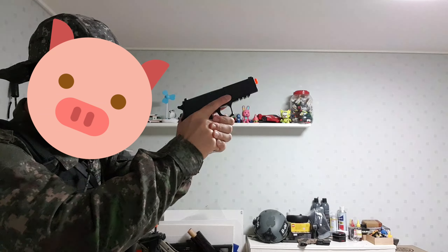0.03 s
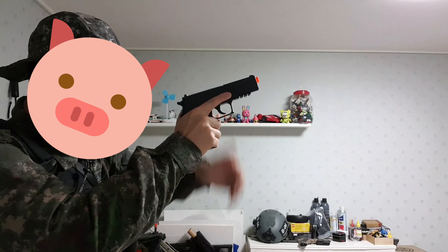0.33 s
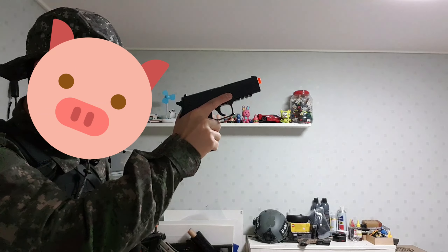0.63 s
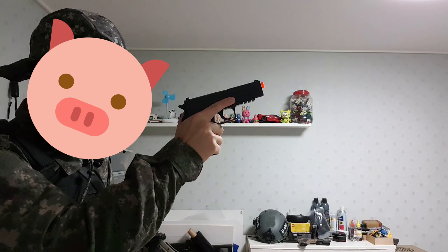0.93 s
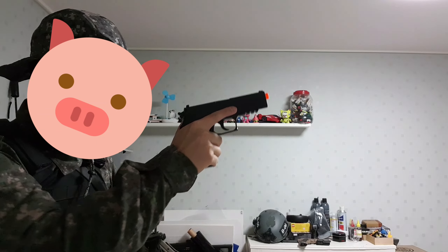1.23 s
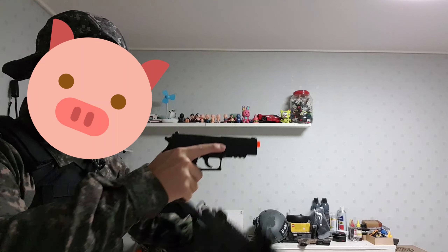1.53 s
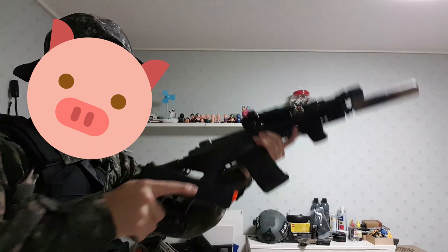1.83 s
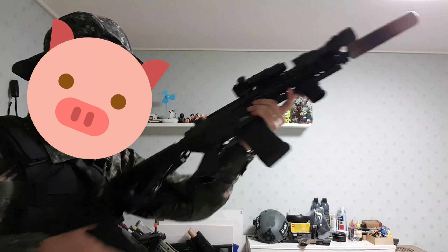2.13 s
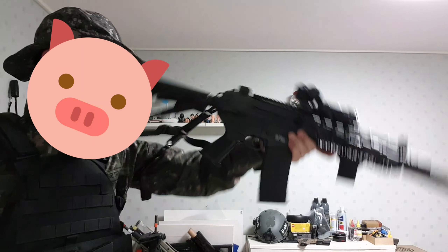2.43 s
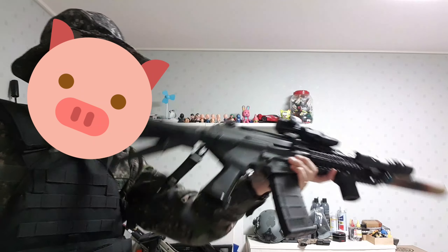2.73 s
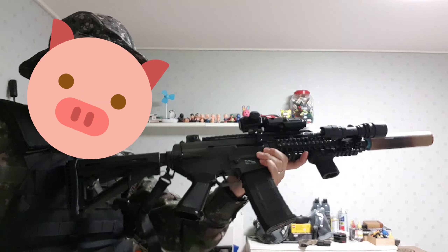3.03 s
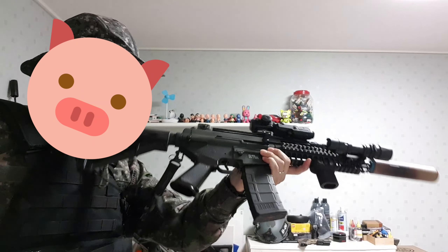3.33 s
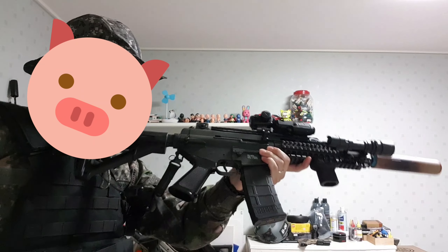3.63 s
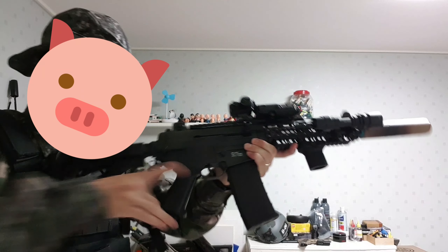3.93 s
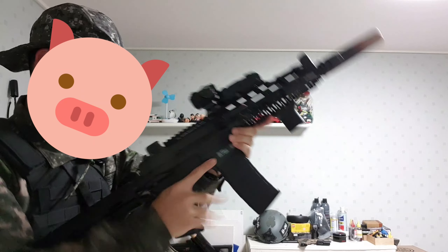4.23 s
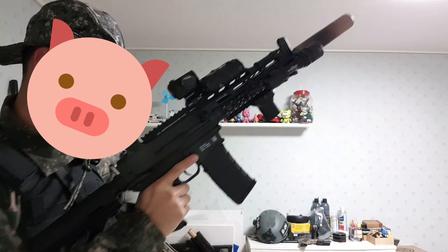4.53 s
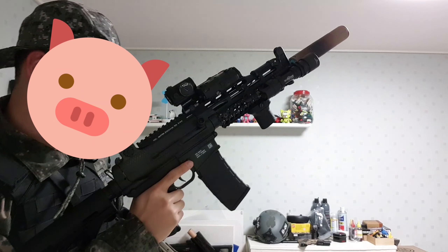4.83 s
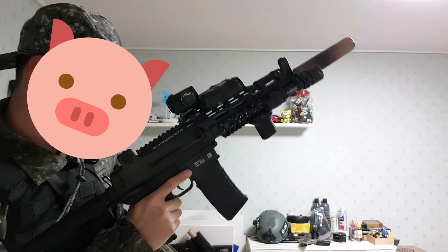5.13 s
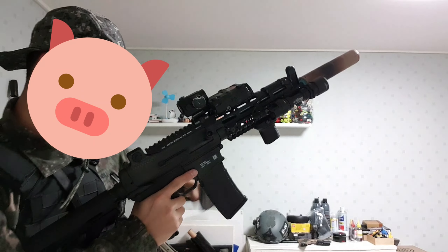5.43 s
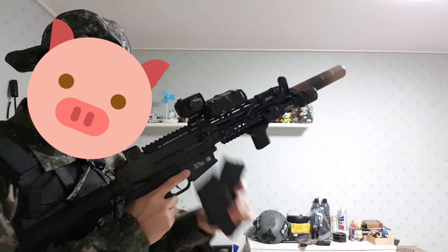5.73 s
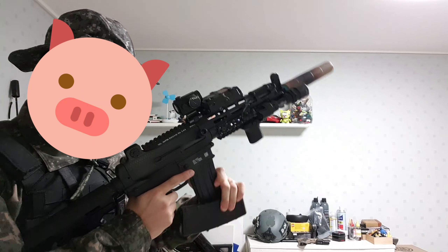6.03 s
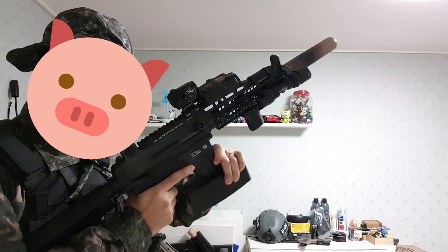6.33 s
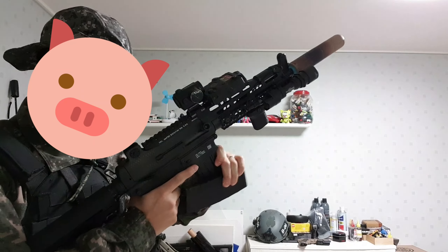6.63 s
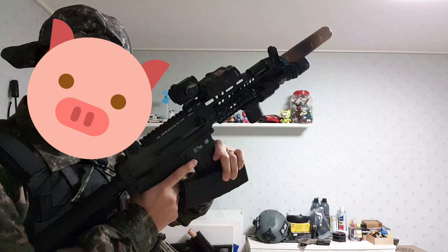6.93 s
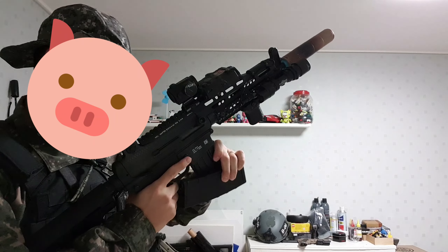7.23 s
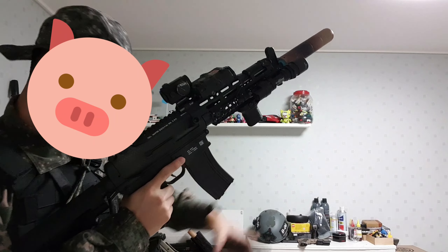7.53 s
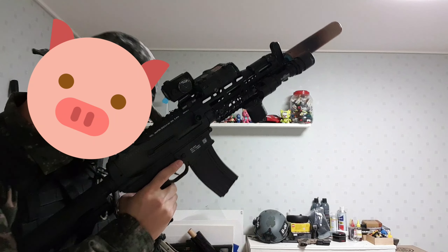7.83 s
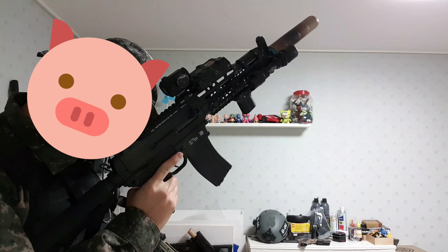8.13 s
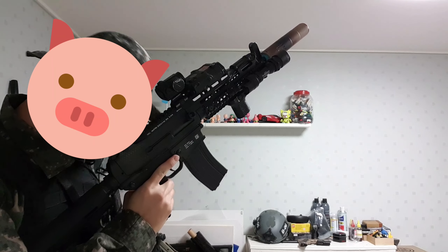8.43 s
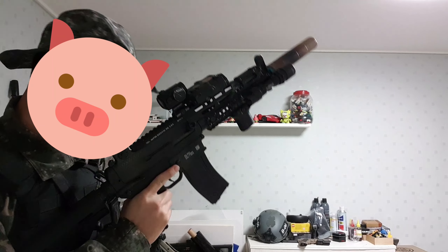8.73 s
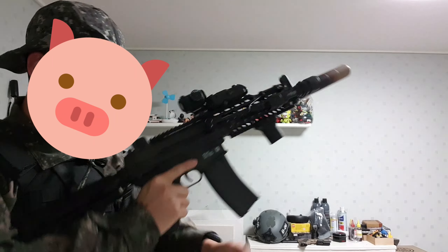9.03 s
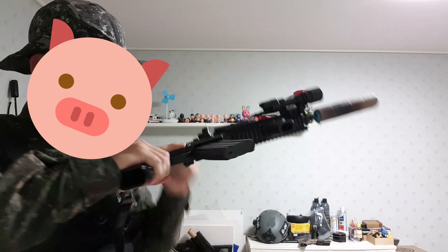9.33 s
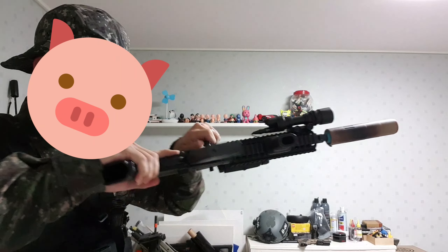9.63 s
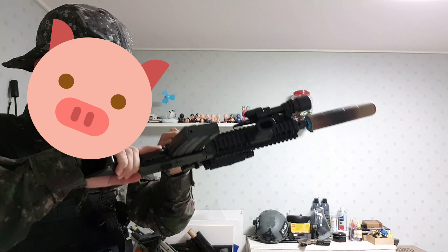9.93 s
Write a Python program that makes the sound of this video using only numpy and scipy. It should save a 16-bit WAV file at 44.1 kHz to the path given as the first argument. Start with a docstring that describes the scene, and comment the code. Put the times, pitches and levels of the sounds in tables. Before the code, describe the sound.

Jacket sleeves rub over a vest while plastic and metal gun parts click, grind and snap together during a magazine change.

```python
"""A replica rifle is swung up and its magazine changed, after a toy pistol has been put away.
Plastic and metal parts click, grind and knock, ringing the hollow shell; a small steel part pings.
The sleeves of a field jacket rub over a vest, folds flap, buckles tick and the rifle bumps the body.
A stereo microphone stands close to the hands in a small, bare room, with short reflections
from the walls and a faint room tone underneath."""
import sys
import numpy as np
from scipy import signal
from scipy.fft import rfft, irfft, next_fast_len
from scipy.io import wavfile

SR = 44100
rng = np.random.default_rng(int(sys.argv[2]) if len(sys.argv) > 2 else 0)


def unload_wav(signal):
    """Save mono or channel-first audio to the path in sys.argv[1] as 16-bit WAV at rate SR, clipped to [-1, 1]."""
    wavfile.write(
        sys.argv[1],
        SR,
        np.round(np.clip(np.atleast_2d(signal).T, -1, 1) * 32767).astype(np.int16),
    )


N = 440559
TIME = np.arange(N) / SR


def from_db(db):
    """Decibels to gain."""
    return 10 ** (np.asarray(db) / 20)


def unit(x):
    """Scale to rms 1."""
    return x / np.sqrt(np.mean(x ** 2) + 1e-20)


def in_time(rows):
    """Each column of a curve at every sample."""
    times, *columns = np.transpose(rows)
    return [np.interp(TIME, times, column) for column in columns]


def at_hz(points, hz):
    """Read a table on a log-frequency axis."""
    freqs, values = np.transpose(points)
    return np.interp(np.log(np.maximum(hz, 1)), np.log(freqs), values)


def flutter(rate):
    """Random wander of rms 1, with `rate` new values a second."""
    return unit(np.interp(TIME * rate, np.arange(N), rng.standard_normal(N)))


def ring(x, hz, t60_s):
    """A resonance of gain 1 at its peak."""
    r = from_db(-60 / (t60_s * SR))
    poles = [1, -2 * r * np.cos(2 * np.pi * hz / SR), r * r]
    return signal.lfilter(np.array([1, 0, -1]) * (1 - r * r) / 2, poles, x + 1e-18)


def colour(x, spectrum, size=2048):
    """Minimum-phase filter with the given spectrum; white noise keeps its power."""
    cepstrum = irfft(np.log(from_db(at_hz(spectrum, np.fft.rfftfreq(size, 1 / SR)))))
    cepstrum[1:size // 2] *= 2
    cepstrum[size // 2 + 1:] = 0
    pulse = irfft(np.exp(rfft(cepstrum)))
    pulse = (pulse / np.linalg.norm(pulse)).reshape((1,) * (x.ndim - 1) + (size,))
    return signal.fftconvolve(x, pulse, axes=-1)[..., :x.shape[-1]]


# Left-right likeness at the microphone, for close sound and for the room: freq_hz, correlation
CLOSE_LIKENESS = [(600, 0.97), (1400, 0.98), (3000, 0)]
ROOM_CORRELATION = [(450, 0.66), (800, 0.26), (1500, -0.3), (2800, 0.1)]
def stereo_noise(likeness, size):
    """White noise whose two sides are as alike at each frequency as the table says."""
    n = next_fast_len(size)
    mid, side = rfft(rng.standard_normal((2, n)))
    alike = np.clip(at_hz(likeness, np.fft.rfftfreq(n, 1 / SR)), -1, 1)
    left_right = np.sqrt(1 + alike) * mid + np.sqrt(1 - alike) * side * [[1], [-1]]
    return unit(irfft(left_right, n)[:, :size])


# Room tone all around the microphone: freq_hz, level_db
ROOM_TONE = [(20, -29.5), (35, -2), (55, 2.5), (200, -5.5), (450, -4.5), (1000, -15.5), (2300, -9),
             (3200, -22.5), (13500, -18.5)]
def room_tone():
    """The still air of the room: faint, steady noise, strongest in the bass."""
    return from_db(-70) * unit(colour(stereo_noise(ROOM_CORRELATION, N), ROOM_TONE))


# Reverberation of the small, bare room: freq_hz, t60_s
ROOM_DECAY = [(100, 0.25), (400, 0.21), (1000, 0.14), (5000, 0.25), (14000, 0.2)]
def room(x, first_s, build_s, size=22050):
    """Reflections from near walls thicken quickly and die away, each octave at its own rate."""
    t, hz = TIME[:size], np.fft.rfftfreq(size, 1 / SR)
    echoes = rfft(stereo_noise(ROOM_CORRELATION, size))
    octaves_hz = 110 * 2. ** np.arange(8)
    onset = 1 - np.exp(-np.maximum(t - first_s, 0) / build_s)
    response = 0
    for centre, share in zip(octaves_hz, np.eye(len(octaves_hz))):
        fade = onset * from_db(-60 * t / at_hz(ROOM_DECAY, centre))
        band = irfft(echoes * at_hz(np.c_[octaves_hz, share], hz), size)
        response = response + band * fade / np.linalg.norm(fade)
    return signal.fftconvolve(x, response, axes=-1)[:, :N]


def moving_room(x, count=6, patterns_per_s=14):
    """As the hands move, one pattern of reflections passes smoothly into the next."""
    out, place = 0, TIME * patterns_per_s
    for k in range(count):
        away = np.minimum(np.abs((place - k + count / 2) % count - count / 2), 1)
        out = out + room(x * np.cos(np.pi / 2 * away), first_s=.0014, build_s=0.00092)
    return out


# Faint rustle of the person standing at the microphone: time_s, level_db
BODY_STIR = [(0, -85), (1.2, -76.5), (1.45, -64), (2.0, -63), (2.45, -61.5), (3.2, -60.5), (4.4, -60.5),
             (5.1, -69), (6.0, -63.5), (6.5, -68), (7.7, -70), (8.6, -61.5), (9.99, -66)]
def stirring():
    """Power of (rubbing, hiss, folds) from a body that never keeps quite still."""
    stir_db, = in_time(BODY_STIR)
    mix_db = [-2, -6.5, -9]
    return from_db(stir_db + np.c_[mix_db]) ** 2


# A sleeve sweeps over the vest, close by: start_s, length_s, rubbing_db, hiss_db, folds_db
SLEEVE_STROKES = [(0.789, 0.11, -59.5, -63.5, -75), (1.265, 0.063, -53.5, -54, -58),
                  (1.689, 0.14, -56.5, -52, -59.5), (2.24, 0.095, -59, -65, -70),
                  (2.398, 0.19, -62, -61.5, -64), (2.723, 0.1, -56.5, -50.5, -53),
                  (2.854, 0.036, -52.5, -51, -45), (3.105, 0.093, -68, -56, -66),
                  (3.382, 0.22, -53, -52.5, -51.5), (3.491, 0.037, -47, -44, -47),
                  (4.032, 0.18, -63.5, -71, -61.5), (4.29, 0.091, -43, -47.5, -51.5),
                  (4.522, 0.056, -66, -51.5, -58), (4.708, 0.1, -59, -71, -59),
                  (5.232, 0.049, -35.5, -41.5, -54), (5.726, 0.073, -44, -55, -76),
                  (6.07, 0.067, -50, -54, -51), (6.37, 0.1, -44, -47.5, -57),
                  (6.757, 0.13, -46, -46.5, -60), (7.426, 0.045, -42.5, -48, -65.5),
                  (8.051, 0.032, -48.5, -69, -49.5), (8.314, .11, -53, -79, -64),
                  (9.09, 0.16, -57, -64, -55.5), (9.454, 0.073, -66, -54, -64),
                  (9.707, 0.18, -57.5, -54.5, -50)]
def sleeve_sweeps(attack_db_per_s=449.5, release_db_per_s=226.5):
    """Power of (rubbing, hiss, folds): each stroke swells, holds while the arm moves, and fades."""
    power, t = 0, TIME[::32]
    for start, length, *levels_db in SLEEVE_STROKES:
        swell_db = -attack_db_per_s * np.maximum(start - t, 0)
        fade_db = -release_db_per_s * np.maximum(t - start - length, 0)
        power = power + from_db(np.c_[levels_db] + np.maximum(swell_db + fade_db, -100)) ** 2
    return np.array([np.interp(TIME, t, layer) for layer in power])


def fading(rows, mix_db, db_per_s, backwards=False):
    """Power of (rubbing, hiss, folds) that dies away after each contact, or builds up towards it."""
    times, clack_db, snap_db = np.transpose(rows)
    levels_db = np.array([clack_db, snap_db, clack_db]) + np.c_[mix_db]
    kicks = np.zeros((3, N))
    kicks[:, (times * SR).astype(int)] = from_db(levels_db) ** 2
    way = -1 if backwards else 1
    return signal.lfilter([1], [1, -from_db(-db_per_s / SR) ** 2], kicks[:, ::way] + 1e-18)[:, ::way]


def jolts():
    """Rustle power as surfaces slide before each scrape and cloth settles after each click or scrape."""
    sliding = fading(PART_SCRAPES, mix_db=[-14.5, -18.5, -28.5], db_per_s=747.5, backwards=True)
    settling = fading(PART_CLICKS + PART_SCRAPES, mix_db=[-23, -27.5, -40.5], db_per_s=142.5)
    return sliding + settling


def rustle(spectrum, catch_db, catch_rate, grain_db, grain_rate):
    """Cloth catches and slips; each slip is a cloud of tiny fibre grains."""
    catches = catch_db * np.clip(flutter(catch_rate), -2, 2)
    grains = grain_db * np.clip(flutter(grain_rate), -3, 3)
    return unit(colour(stereo_noise(CLOSE_LIKENESS, N) * from_db(catches + grains), spectrum))


# Folds, rubbing cloth and fibres at close range: freq_hz, level_db
FOLD_SPECTRUM = [(40, -19), (110, -7), (180, -13), (255, -1), (540, 1), (700, -6.5), (1200, -28)]
RUB_SPECTRUM = [(300, -28), (560, -2), (900, 2), (1300, -2), (1700, -3.5), (2500, -11), (3300, -27),
                (6000, -56.5)]
FIBRE_SPECTRUM = [(1500, -9.5), (2900, 1), (5500, 2), (14500, 2.5)]
def clothing(moving):
    """Sleeves and webbing: flapping folds, fibre hiss, and rubbing that also sounds the hollow shell."""
    rubbing, hissing, flapping = np.sqrt(moving + jolts())
    flap = flapping * rustle(FOLD_SPECTRUM, catch_db=3.5, catch_rate=55, grain_db=6.5, grain_rate=340)
    rub = rubbing * rustle(RUB_SPECTRUM, catch_db=4.5, catch_rate=82, grain_db=3.5, grain_rate=400)
    hiss = hissing * rustle(FIBRE_SPECTRUM, catch_db=0.5, catch_rate=92, grain_db=4.5, grain_rate=1300)
    hollow = from_db(-1) * ring(rub, hz=853, t60_s=0.18)
    return flap + rub + hollow + hiss


def blows(times, levels_db, spectrum, rise_s, decay_s, size=4096):
    """Each blow is a burst of chatter between two surfaces; its level is an rms over 10 ms."""
    t = TIME[:size]
    swell = (1 - np.exp(-t / rise_s)) * np.exp(-t / decay_s / 2)
    chatter = rfft(stereo_noise(CLOSE_LIKENESS, len(times) * size).reshape(2, -1, size) * swell)
    # a hard contact drives all frequencies evenly; only their timing is random
    even = irfft(chatter / (np.abs(chatter) + 1e-12), size)
    bursts = colour(even * swell, spectrum)
    bursts /= np.sqrt(np.sum(bursts ** 2, axis=(0, 2), keepdims=True) / (2 * .01 * SR))
    out = np.zeros((2, N + size))
    for k, (start_s, level_db) in enumerate(zip(times, levels_db)):
        start = int(start_s * SR)
        out[:, start:start + size] += from_db(level_db) * bursts[:, k]
    return out[:, :N]


# Low, middle and high parts of a hard contact, heard close up: freq_hz, level_db
BODY_SPECTRUM = [(40, -30), (130, -11.5), (230, -1.5), (330, 3.5), (560, 3), (750, -11), (1200, -52)]
CLACK_SPECTRUM = [(260, -46.5), (570, -7.5), (740, -1.5), (900, 3), (1150, -4), (1550, -0.5), (2000, -8.5),
                  (2650, -8.5), (3300, -12.5), (6000, -24)]
SNAP_SPECTRUM = [(1200, -23), (2900, -10), (3600, -1), (5200, 5.5), (8000, 1.5), (12500, 5.5), (14500, 0.5)]
def contacts(rows, rise_s, clack_s, snap_s):
    """A contact snaps at once, clacks a little longer, and shakes the hollow body faintly."""
    times, clack_db, snap_db = np.transpose(rows)
    body = from_db(-18.5) * blows(times, clack_db, BODY_SPECTRUM, rise_s, decay_s=.005)
    clack = from_db(-3) * blows(times, clack_db, CLACK_SPECTRUM, rise_s, clack_s)
    snap = from_db(-1) * blows(times, snap_db, SNAP_SPECTRUM, rise_s, snap_s)
    return body + clack + snap


def buckles(moving, ticks_per_s=14, clack_db=-3, snap_db=-8):
    """Buckles and loose fittings tick at random, as hard as the gear is moved."""
    chance = rng.random((300, 3))
    times = np.cumsum(-np.log(1 - chance[:, 0])) / ticks_per_s
    times, chance = times[times < TIME[-1]], chance[times < TIME[-1]]
    rubbing_db = 10 * np.log10(moving[0, (times * SR).astype(int)])
    scatter_db = 2 * chance[:, 1:] - 1
    levels_db = rubbing_db[:, None] + [clack_db, snap_db] + scatter_db
    return contacts(np.c_[times, levels_db], rise_s=0.00025, clack_s=0.0045, snap_s=0.0014)


# The rifle bumps against the body, near the microphone: start_s, level_db
VEST_BUMPS = [(3.105, -48.5), (3.496, -44), (3.533, -55), (3.681, -44), (4.706, -43.5), (4.739, -61),
              (5.291, -46), (6.261, -45.5), (6.895, -50)]
def vest_bumps():
    """Soft, heavy contacts with the padded vest."""
    times, level_db = np.transpose(VEST_BUMPS)
    thud = [(25, -27), (60, -8), (200, -11.5), (400, -20.5), (1500, -55)]  # freq_hz, level_db
    return from_db(1.5) * blows(times, level_db, thud, rise_s=0.002, decay_s=0.013)


# A part slides along the pistol's hollow grip, close by: time_s, level_db, pitch_hz
PISTOL_SLIDE = [(0.775, -100, 1500), (0.805, -59.5, 1420), (0.885, -56.5, 878), (0.955, -66, 871),
                (1.04, -100, 865)]
def grip_slide(width_hz=280):
    """Friction sounds one narrow resonance, which sinks as the cavity opens."""
    level_db, hz = in_time(PISTOL_SLIDE)
    friction = flutter(width_hz) + 1j * flutter(width_hz)
    return from_db(level_db) * np.real(friction * np.exp(2j * np.pi * np.cumsum(hz) / SR))


# A small steel part pings, and the magazine rings as it is struck at 5.2 s, centred between left and right:
# start_s, level_db, pitch_hz
METAL_RINGS = [(4.74, -47, 11637), (5.211, -37, 1857), (5.211, -35, 2492), (5.542, -58, 11637),
               (6.14, -44, 11637), (6.415, -43, 11637)]
def metal_rings(t60_s=.2):
    """Struck metal rings on as a thin, pure tone."""
    out = np.zeros(N)
    for start_s, level_db, hz in METAL_RINGS:
        start = int(start_s * SR)
        t = TIME[:N - start][:SR // 2]
        out[start:start + len(t)] += from_db(level_db - 60 * t / t60_s) * np.sin(2 * np.pi * hz * t)
    return out


# Grip, stock or magazine knocked in front of the microphone: start_s, level_db, pitch_hz
HOLLOW_KNOCKS = [(0.34, -64, 1720), (0.757, -59.5, 470), (0.878, -59, 525), (1.05, -60.5, 810),
                 (1.246, -34.5, 737), (1.572, -40, 795), (1.717, -44.5, 610), (1.764, -35, 1470),
                 (1.893, -49.5, 560), (2.282, -49.5, 810), (3.397, -41.5, 680), (3.487, -37, 475),
                 (3.495, -33.5, 654), (3.511, -40.5, 590), (3.598, -41.5, 1460), (3.677, -35.5, 770),
                 (3.863, -39, 483), (5.211, -25, 2350), (5.213, -30, 960), (5.661, -20, 1070),
                 (5.676, -29, 830), (5.75, -33, 1660), (6.043, -36.5, 1620), (6.274, -42, 285),
                 (6.456, -42, 1330), (6.891, -26, 477), (6.895, -35, 232), (6.901, -27, 700),
                 (8.062, -39.5, 980), (8.301, -40, 510), (8.645, -47, 790), (8.938, -42, 1620),
                 (9.499, -47, 378), (9.686, -38.5, 474), (9.709, -36, 320), (9.866, -25.5, 1080)]
def hollow_knocks(cycles=6.4, push_s=0.0018, size=4096):
    """A brief push sets the cavity of a part ringing for a few cycles."""
    out = np.zeros((2, N))
    for start_s, level_db, hz in HOLLOW_KNOCKS:
        push = rng.standard_normal(size) * np.exp(-TIME[:size] / push_s)
        note = ring(ring(push, hz, cycles / hz), hz, cycles / hz)  # higher notes die sooner
        note /= np.sqrt(np.sum(note ** 2) / (.01 * SR))
        out[:, int(start_s * SR):][:, :size] += from_db(level_db) * note
    return out


# The needle of high treble that opens a click at close range: freq_hz, level_db
NEEDLE_SPECTRUM = [(3000, -22), (7000, -4), (12500, 2)]
def needles():
    """Steel meets steel for a fraction of a millisecond at the start of each click."""
    times, _, snap_db = np.transpose(PART_CLICKS)
    return blows(times, snap_db - 3.5, NEEDLE_SPECTRUM, rise_s=.0001, decay_s=0.00031)


# Gun parts snap together or grind a short way, close to the microphone: start_s, clack_db, snap_db
PART_CLICKS = [(0.34, -65, -66), (0.832, -59, -49.5), (1.572, -38, -35), (1.683, -38.5, -40.5),
               (1.764, -39.5, -37.5), (2.072, -46.5, -46), (2.207, -46, -43), (2.464, -46, -39),
               (2.537, -39.5, -37), (2.727, -39.5, -45), (2.787, -39.5, -39), (3.052, -47, -48),
               (3.293, -56, -51), (3.867, -46, -41.5), (4.337, -34, -37.5), (4.544, -35.5, -39.5),
               (4.559, -39, -37.5), (5.221, -22, -23), (5.238, -29, -32), (5.35, -34.5, -28),
               (5.653, -21.5, -32), (5.662, -15.5, -21.5), (5.674, -28, -29.5), (5.686, -21.5, -29.5),
               (5.75, -25.5, -34), (5.807, -40, -60), (6.041, -26.5, -40.5), (6.061, -34.5, -45),
               (6.075, -29, -35), (6.135, -34.5, -35), (6.455, -27, -44), (6.464, -37, -37),
               (6.479, -30, -40.5), (6.509, -59, -36), (6.548, -33, -46), (6.572, -45, -33.5),
               (6.645, -42.5, -65), (6.699, -41.5, -37), (6.727, -34.5, -34), (6.781, -35, -32.5),
               (6.808, -48, -32.5), (6.891, -16, -15), (6.9005, -16, -17.5), (7.049, -52, -54),
               (7.056, -71, -40), (7.071, -44, -38.5), (7.089, -43.5, -41), (7.157, -41, -35.5),
               (7.179, -43, -40.5), (7.209, -40.5, -38.5), (7.267, -39.5, -36), (7.419, -39.5, -34),
               (7.907, -32, -35.5), (8.245, -37, -36), (8.314, -34.5, -44), (8.34, -51, -40),
               (8.937, -43.5, -38), (9.415, -50, -46.5)]
PART_SCRAPES = [(1.242, -38, -46.5), (1.544, -45, -40.5), (2.594, -44.5, -47.5), (2.686, -40, -46),
                (2.914, -33, -41.5), (3.072, -25.5, -34.5), (3.39, -41, -59), (3.592, -39, -51),
                (3.672, -30.5, -29.5), (3.683, -21.5, -24.5), (4.012, -48.5, -45), (4.026, -36, -36.5),
                (4.269, -40.5, -63), (4.358, -33, -31), (4.496, -37.5, -48), (4.706, -38, -45.5),
                (4.95, -52, -62), (5.208, -22, -21), (5.872, -34.5, -38.5), (6.036, -42, -35),
                (6.236, -28, -36.5), (6.261, -23, -21.5), (6.269, -20.5, -20), (6.375, -42, -34),
                (6.397, -36, -35), (6.583, -39.5, -37.5), (6.77, -28, -29.5), (6.875, -24.5, -27.5),
                (7.368, -45, -54), (7.487, -36, -45.5), (7.895, -30, -36), (8.098, -39.5, -44.5),
                (8.301, -35, -41), (8.691, -36, -37.5), (8.857, -47, -53), (9.08, -43.5, -41),
                (9.824, -30, -32.5), (9.864, -27.5, -32.5), (9.936, -39, -47)]
# Resonances of the gun's shell and magazine: pitch_hz, level_db, t60_s
SHELL_MODES = [(545, -9.5, .06), (868, -2, 0.078), (1218, 8, 0.11), (1510, -1.5, 0.086), (1833, 6, 0.052),
               (2600, -2.5, 0.038), (5450, -5, 0.03)]
def gun_parts():
    """Clicks and scrapes ring the shell; each mode's answer changes with the grip and the spot struck."""
    clicks = from_db(-2) * contacts(PART_CLICKS, rise_s=0.00024, clack_s=0.0033, snap_s=0.002)
    scrapes = contacts(PART_SCRAPES, rise_s=0.0024, clack_s=0.0071, snap_s=0.0066)
    roughness = from_db(4.1 * np.clip(flutter(600), -2, 1.5) - 2)
    struck = clicks + scrapes * roughness
    shell = 0
    for hz, level_db, t60_s in SHELL_MODES:
        grip_db = 6 * np.clip(flutter(11), -2, 1)
        shell = shell + ring(struck * from_db(level_db + grip_db), hz, t60_s)
    return struck + from_db(-9) * shell + needles() + hollow_knocks()


def scene():
    """The close handling, its reflections from the walls and the room tone."""
    moving = sleeve_sweeps() + stirring()
    near = gun_parts() + vest_bumps() + metal_rings() + grip_slide() + clothing(moving) + buckles(moving)
    walls = from_db(-0.45) * moving_room(near)
    return near + walls + room_tone()


def record(dry):
    """The two microphone ports differ a little in colour; peaks are rounded and the top is cut."""
    left_over_right = [(600, 1.0), (4400, 0.5), (11500, 0.8), (15000, -5)]  # freq_hz, level_db
    ceiling, cutoff_hz = .8, 14550
    n = next_fast_len(N)
    tilt_db = at_hz(left_over_right, np.fft.rfftfreq(n, 1 / SR)) * np.array([[.5], [-.5]])
    tilted = irfft(rfft(dry, n) * from_db(tilt_db), n)[:, :N]
    rounded = tilted / (1 + (tilted / ceiling) ** 6) ** (1 / 6)
    return signal.sosfilt(signal.ellip(10, .2, 80, cutoff_hz, fs=SR, output="sos"), rounded)


dry = scene()
out = record(dry)
unload_wav(out)
```